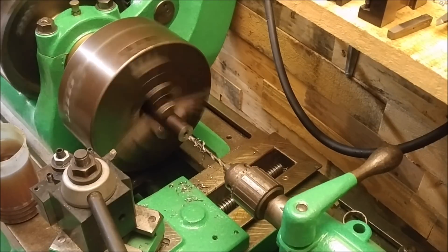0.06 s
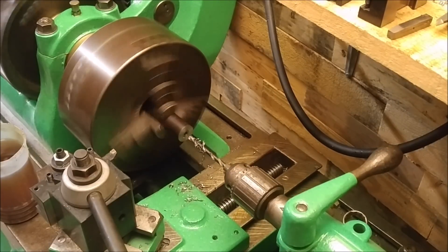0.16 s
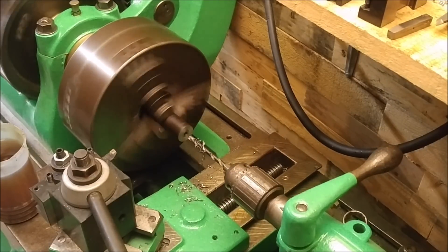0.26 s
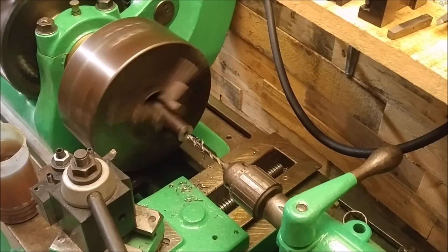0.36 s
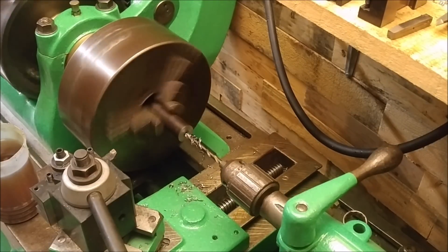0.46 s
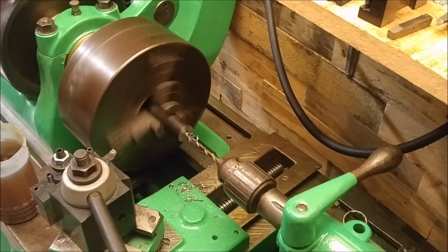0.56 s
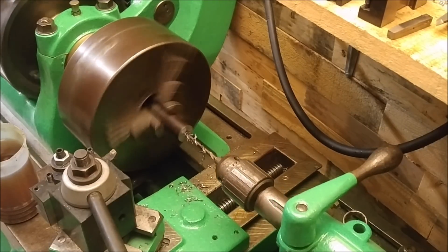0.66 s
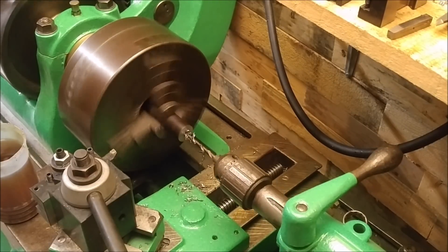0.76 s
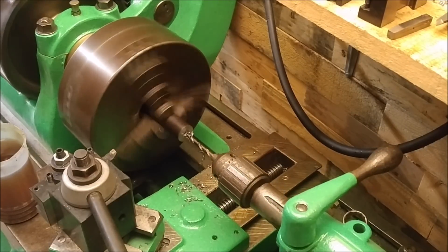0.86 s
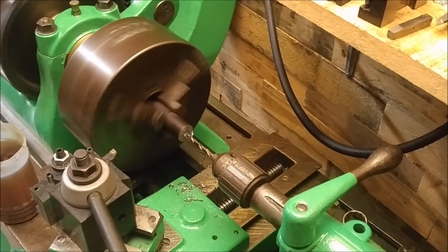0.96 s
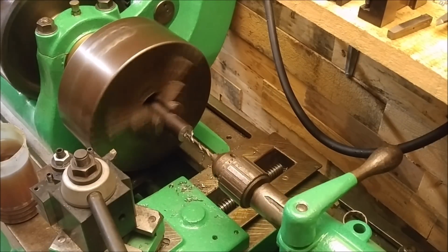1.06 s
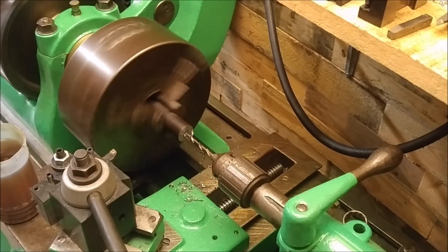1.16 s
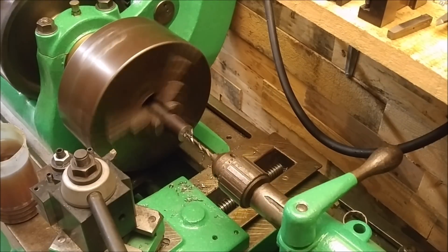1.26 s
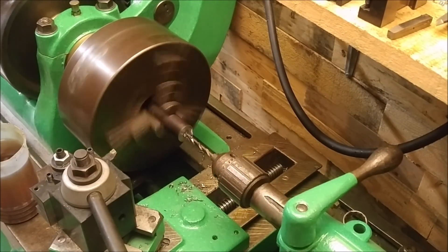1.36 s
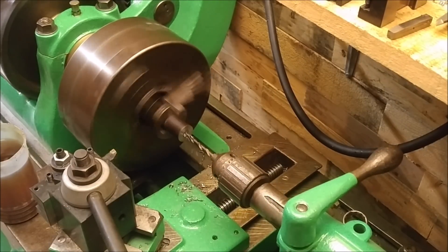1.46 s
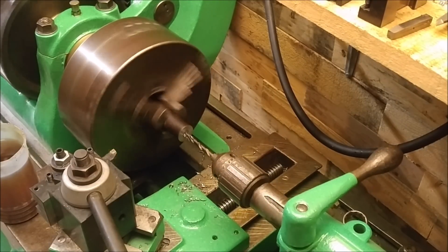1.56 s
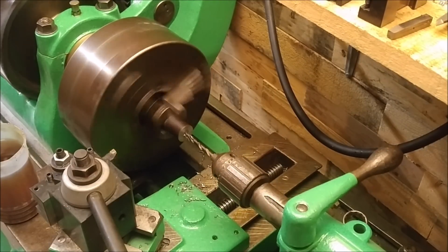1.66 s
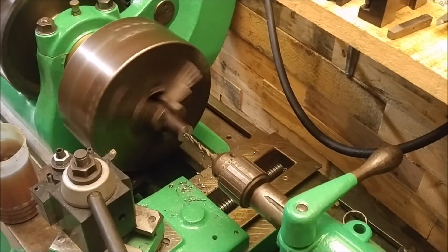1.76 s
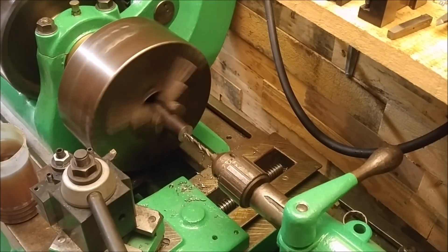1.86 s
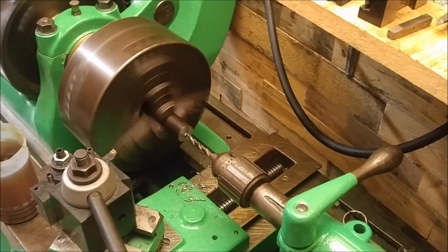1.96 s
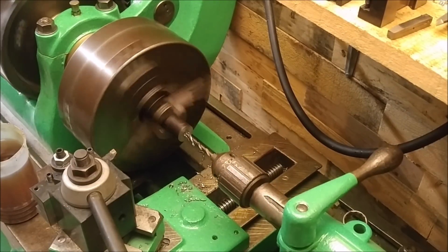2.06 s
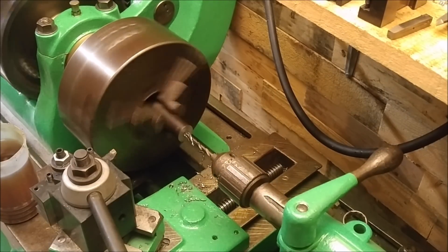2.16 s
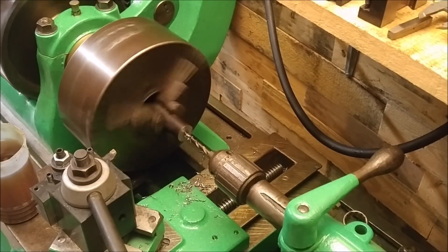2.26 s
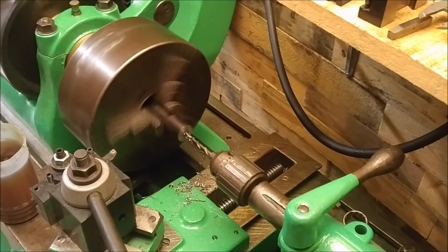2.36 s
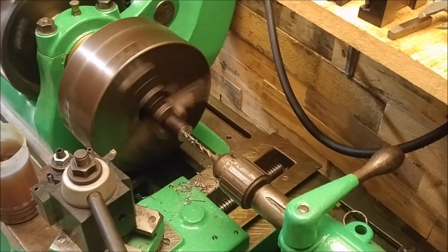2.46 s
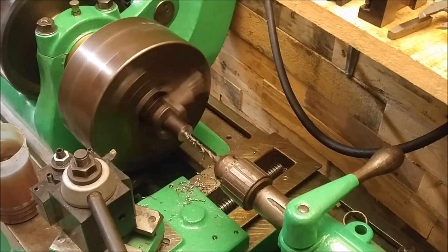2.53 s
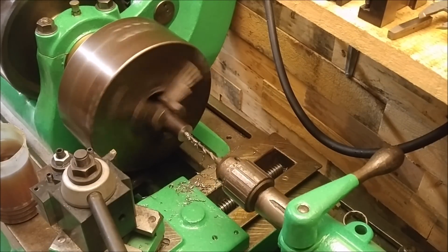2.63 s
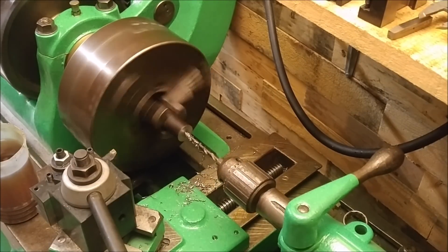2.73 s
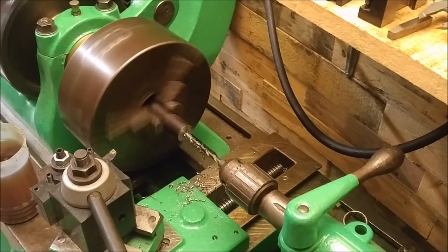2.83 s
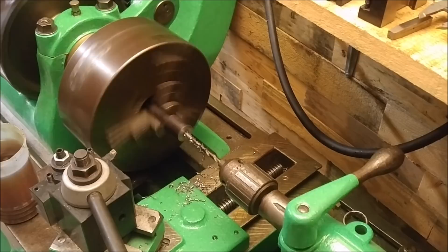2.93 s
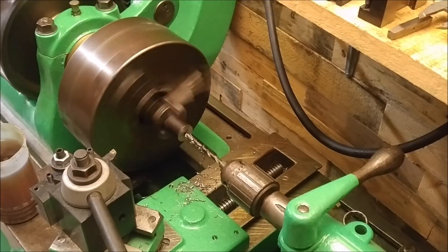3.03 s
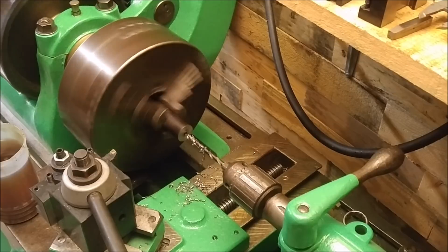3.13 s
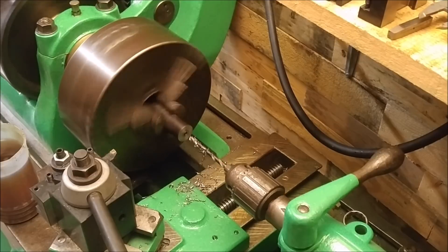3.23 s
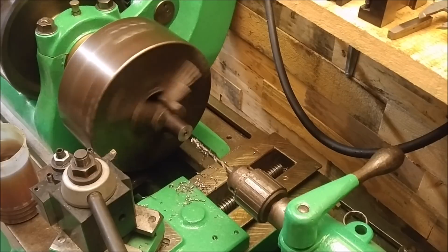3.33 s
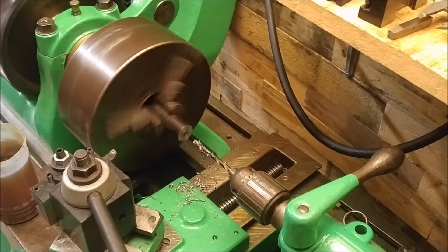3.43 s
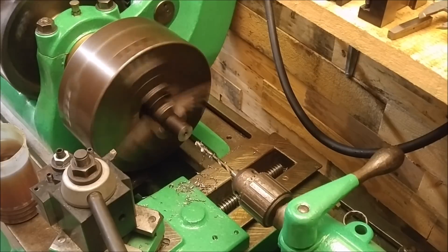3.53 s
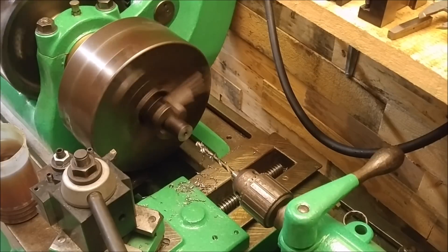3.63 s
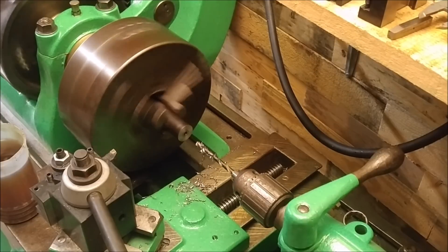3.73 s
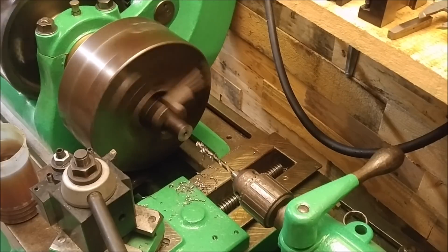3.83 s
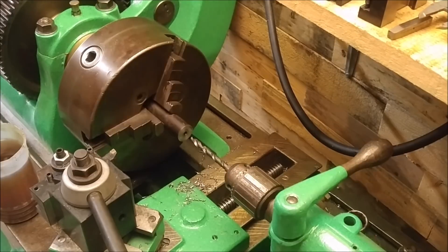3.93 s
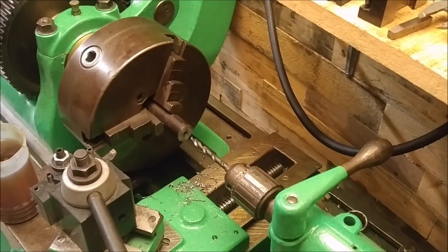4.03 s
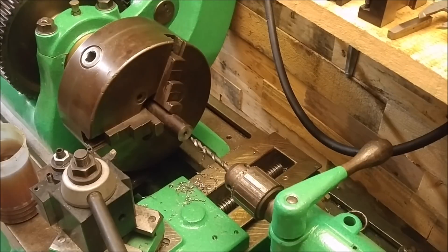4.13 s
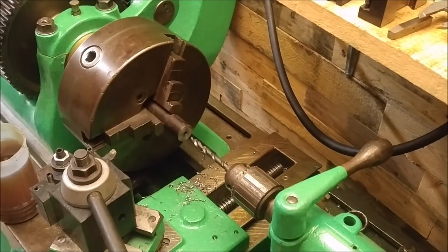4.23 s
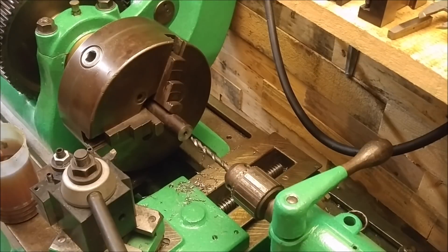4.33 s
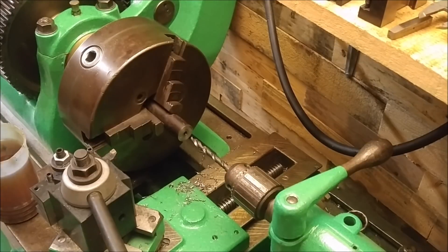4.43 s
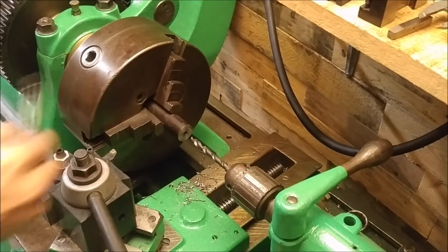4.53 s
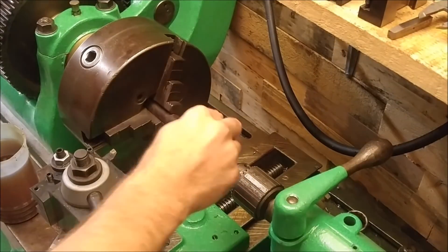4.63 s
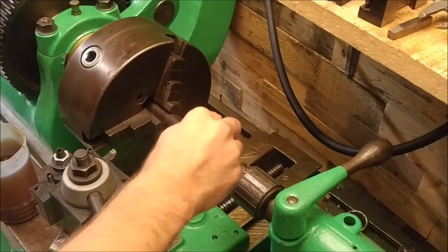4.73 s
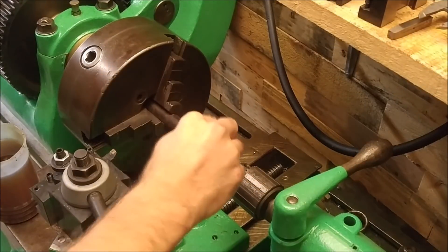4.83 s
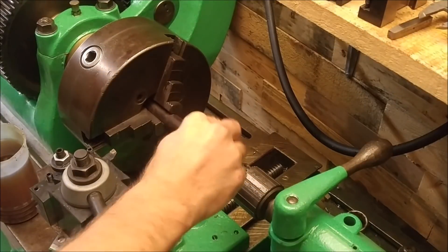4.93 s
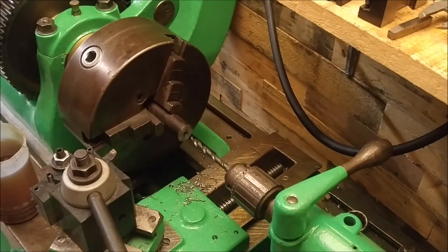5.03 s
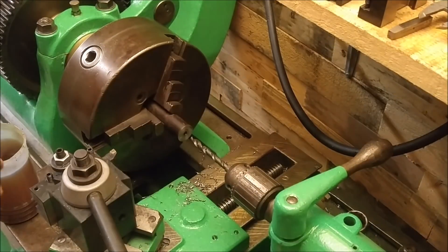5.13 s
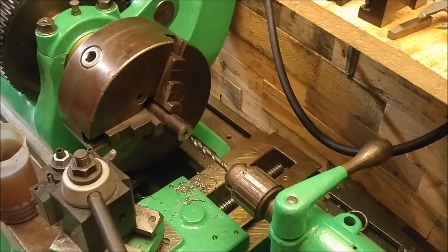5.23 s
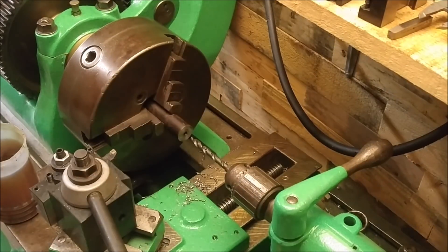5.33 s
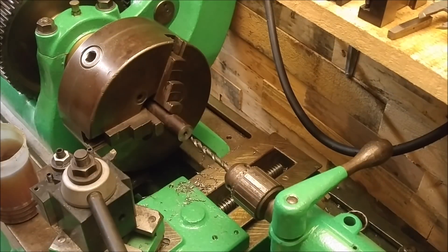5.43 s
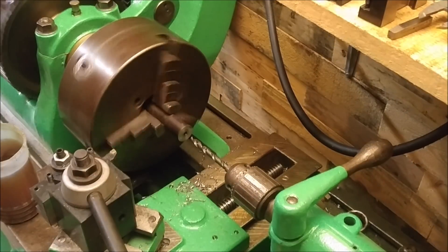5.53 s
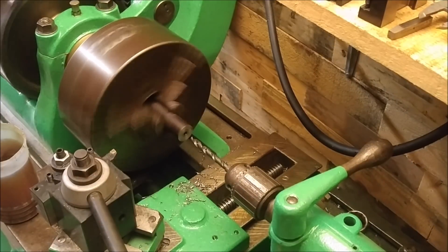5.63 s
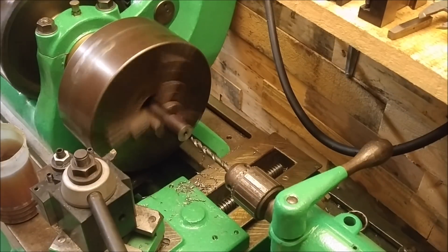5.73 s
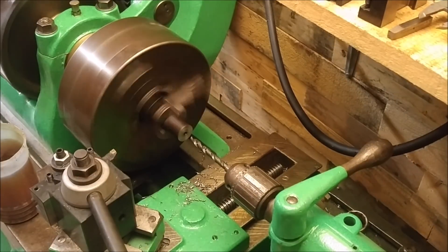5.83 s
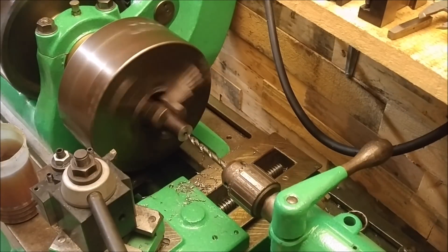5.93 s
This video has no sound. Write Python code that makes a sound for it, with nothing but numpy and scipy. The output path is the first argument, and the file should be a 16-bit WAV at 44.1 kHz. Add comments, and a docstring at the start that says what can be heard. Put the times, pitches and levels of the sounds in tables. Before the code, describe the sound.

Close in a small workshop, a metal lathe starts with a quick double clunk and runs for four seconds, a midrange gear whir under bright, uneven rattle, hiss and metallic pings as a drill bores steel. It stops dead. In the quiet come faint rustles, small ticks and a run of short thin squeaks, then one steel tick. A click and heavier clunk restart the machine, which is still running at the end.

```python
"""A small workshop lathe starts with a double clunk, whirs and rattles while a drill bores a steel bar,
and stops dead; after a pause it starts again. Gear tones and coloured noise make the whir; noise and
cutting ticks ring the castings, and every shaft knock swells the rattle and sets small parts pinging.
Mains hum and quiet air lie beneath; the pause holds rustles, ticks of noise and ringing steel,
and squeaks of a rubbing part."""
import sys
import numpy as np
from scipy import signal
from scipy.fft import rfft, irfft, next_fast_len
from scipy.io import wavfile
from scipy.ndimage import uniform_filter1d, map_coordinates

SR = 44100
rng = np.random.default_rng(int(sys.argv[2]) if len(sys.argv) > 2 else 0)


def inscribe(sig):
    """Save sig as 16-bit PCM at rate SR to the path in sys.argv[1].

    A 1-D sig is mono; a 2-D sig holds one channel per row.
    Samples are clipped to [-1, 1] before scaling.
    """
    pcm = np.round(np.clip(np.atleast_2d(sig).T, -1, 1) * 32767)
    wavfile.write(sys.argv[1], SR, pcm.astype(np.int16))


def rack_gain(trim_db):
    """Turn a fader trim in dB into the linear factor to multiply a signal by."""
    fader = np.asarray(trim_db, float)
    return 10 ** (fader / 20)


N = 263718
T = np.arange(N) / SR  # seconds

# Runs of the motor. Each row: switch-on in seconds, switch-off in seconds, force of the start in dB.
RUNS = [(0.0217, 3.966, -2), (5.5432, 6.1, 2)]

# Mains hum and fainter steady lines. Each row: frequency in Hz, level in dB rms, unsteadiness 0-1.
HUM = [(120, -100, .2), (229.5, -79, .3), (286, -88, .3), (479.8, -68.5, .04), (959.5, -87, .06),
       (15702, -91, .05)]
# Colour of the room air. Each row: frequency in Hz, relative density in dB.
AIR_COLOUR = [(20, -30), (55, -47.5), (95, -44), (130, -32.5), (176, -22), (229, -16), (290, -18),
              (420, -23.5), (680, -27.5), (900, -29), (2040, -42.5), (3900, -36), (5200, -38.5),
              (7000, -39), (12000, -39.5), (15900, -40)]
AIR_DB = -75  # rms

# Working load, one list a run. Each row: time in seconds, drone setting in dB, rattle setting in dB.
LOAD = [
    [(0.2, -38, -38), (0.28, -39, -40), (0.7, -40.5, -38.5), (1.29, -40, -36.5), (1.62, -40.5, -36),
     (1.79, -41, -37), (2.18, -39.5, -36.5), (2.3, -40, -38), (2.72, -40, -39), (3.18, -40.5, -39),
     (3.47, -41, -38), (3.7, -40.5, -39.5)],
    [(5.76, -38.5, -38), (5.97, -37.5, -36.5)],
]
# Shaft orders and motor hum. Each row: frequency in Hz, rms at the usual load in dB, unsteadiness 0-1.
SHAFT_TONES = [(167, -77.5, 0.2), (201, -72.5, 0.2), (237, -53, 0.15), (272, -58.5, 0.15),
               (302.8, -64.5, 0.3), (371.6, -53, 0.3), (480.5, -48, 0.1), (574.5, -43, 0.09),
               (538, -56.5, .4), (609, -57.5, .4), (637, -60, .5), (707.6, -46, 0.22), (738.4, -56.5, 0.3),
               (978, -65.5, .3), (1111, -65, .4), (1222, -63.5, .4), (1442, -56, 0.4), (1712, -62, .15),
               (1847, -72, 0.3)]
# Gear mesh, a row a harmonic: lower sideband, centre and upper sideband in dB rms at the usual load,
# unsteadiness 0-1.
MESH = [(-56, -52.5, -69.5, 0.41), (-56.5, -55.5, -53, 0.2)]
MESH_HZ, ECCENTRIC_HZ = 1186.1, 38.4  # tooth rate; distance of the sidebands
# Roar of bed and bench. Each row: frequency in Hz, relative density in dB.
ROAR_COLOUR = [(30, -51.5), (70, -50.5), (110, -40.5), (160, -29.5), (250, -12.5), (335, -15.5), (430, -16),
               (520, -3.5), (700, -1.5), (775, -10.5), (820, -11.5), (885, -16.5), (920, -11.5),
               (975, -13.5), (1050, -14.5), (1180, -7), (1265, -11.5), (1340, -6), (1490, -7), (1800, -18),
               (1860, -17), (2050, -28), (2300, -68)]

# Shafts that take up their slack once a turn. Each row: turns per second, then the first knock of
# each run in seconds.
SHAFTS = [(38.33, 0.1149, 5.6248), (34.95, 0.1084, 5.6205), (33.78, 0.1, 5.6139)]
SLACK_S, UNEVEN_DB, SURGE_DB = 0.0015, 3, 1.57  # scatter of the knocks in time and force; slow surges
# The hardest knocks. Each row: time in seconds, rattle setting in dB, ping setting in dB.
HARD_KNOCKS = [(0.0645, -24, -39), (0.1098, -36.5, -54.5), (0.1905, -35, -49), (0.2225, -28, -45.5),
               (0.2489, -30, -56), (0.2753, -31, -55.5), (0.3083, -31.5, -46), (0.3672, -31.5, -56),
               (0.425, -30.5, -49.5), (0.4566, -30.5, -50), (0.484, -33, -51.5), (0.6027, -38.5, -57),
               (0.6909, -33, -73.5), (.7509, -38, -56.5), (0.7704, -34.5, -57), (0.7962, -29.5, -56),
               (.8382, -33, -55.5), (0.876, -33, -57), (0.9025, -32, -56), (1.0582, -37, -53.5),
               (1.106, -30, -50), (1.1649, -35, -58.5), (1.2947, -35, -57), (1.3166, -31, -56),
               (1.3434, -29, -48), (1.4273, -31, -55.5), (1.576, -36, -52.5), (1.6583, -29.5, -55.5),
               (1.6837, -31.5, -55.5), (1.8448, -29.5, -55.5), (1.8933, -28, -53), (1.918, -28, -52.5),
               (1.947, -24.5, -48), (1.974, -28, -54.5), (1.998, -31, -59.5), (2.152, -31, -49.5),
               (2.203, -27, -50), (2.234, -29, -52.5), (2.2764, -29, -52.5), (2.3078, -32.5, -54.5),
               (2.389, -36, -56), (2.538, -31, -42), (2.5946, -31.5, -53), (2.653, -45, -46.5),
               (2.694, -32, -58), (2.721, -34, -57), (2.7483, -32, -53), (2.772, -31.5, -57.5),
               (2.7944, -26, -43), (2.8236, -33.5, -53), (2.852, -31.5, -50.5), (2.8825, -33, -53),
               (2.9426, -27.5, -44.5), (2.9702, -32, -44), (3.0644, -34, -58), (3.0919, -29, -48),
               (3.1215, -34.5, -56), (3.1449, -36.5, -55.5), (3.326, -29.5, -57.5), (3.565, -35, -54),
               (3.665, -38, -50), (3.6913, -31, -43.5), (3.714, -28.5, -47.5), (3.7394, -33, -53),
               (3.7979, -31.5, -54), (3.858, -31, -41.5), (3.944, -27.5, -39.5), (5.5444, -38.5, -47.5),
               (5.5818, -27.5, -39.5), (5.5974, -29.5, -48), (5.6796, -32, -49.5), (5.706, -27.5, -47.5),
               (5.7914, -29, -41), (5.913, -30.5, -43.5), (5.9415, -31, -48.5), (5.9674, -31, -50)]

# Broad belt and cutting noise. Each row: frequency in Hz, relative density in dB.
RATTLE_COLOUR = [(1200, -59), (2050, -20.5), (2350, -4), (2630, -2.5), (2890, -1), (3170, 0.5),
                 (3700, -3.5), (4280, -6.5), (4870, -3), (6750, -10.5), (9000, -16), (11500, -24.5),
                 (15900, -34)]
# Resonances of covers and castings. Each row: frequency in Hz, width in Hz, gain in dB before the
# broad colour.
CASTING_MODES = [(2624, 25, -0.5), (2898, 21, 5), (2977, 52, -1), (3430, 40, -2), (3560, 36, 0.5),
                 (3670, 41, 2), (3830, 66, 8.5), (4000, 40, 4.5), (4050, 26, 1.5), (4420, 44, 1.5),
                 (4590, 55, -1), (4840, 52, 1.5), (5020, 82, 2), (5373, 90, 2), (5820, 64, 4),
                 (6180, 65, 3.5), (6707, 70, 3), (6770, 63, 2.5), (7140, 60, -3), (7310, 60, -1.5),
                 (7410, 70, 1.5), (7890, 120, -2), (8600, 360, -3.5), (9360, 90, 0), (10610, 80, -3),
                 (10700, 59, -1.5), (11100, 60, -5), (13190, 77, -5), (13900, 200, -4)]
# Ticks of the cutting edges: rate, share of the rattle's power, unringing part of their colour.
CHATTER_PER_S, CHATTER_SHARE, CHATTER_BROAD = 2200, 0.35, 0.45
# A loose small part. Each row: frequency in Hz, width in Hz, relative level in dB.
PING_MODES = [(12050, 150, 0), (14500, 350, -7), (13100, 500, -9), (9430, 110, -2)]
PING_DB, PING_GROWS = -32, 2  # ordinary ping relative to the rattle setting; power of the force it follows
# A thin guard. Each row: frequency in Hz, width in Hz, relative level in dB.
GUARD_MODES = [(6000, 120, -2), (6720, 150, 2), (6940, 120, -3.5), (7210, 110, -2.5), (7530, 120, -0.5),
               (8550, 270, -8)]
CLANK_DB = 9.5  # drive of the guard over that of the ping
# Hiss of the bearings. Each row: frequency in Hz, relative density in dB.
HISS_COLOUR = [(5000, -33), (8000, -12), (10500, 2), (11500, -6), (13900, -1.5), (14800, -2), (15900, -9.5)]
HISS_WAVER_DB = 2

# The two jolts of every start: motor, then take-up of the drive. Each row: seconds after switch-on,
# frequency in Hz, glide in Hz per second, peak in dB before the force of the start, length in seconds.
START_JOLTS = [(0.02, 237, 900, -23, 0.024), (0.046, 535, 5164, -21, 0.0199)]
# Bumps through the bench. Each row: time in seconds, frequency in Hz, peak in dB, length in seconds.
BUMPS = [(2.245, 60.3, -48, 0.0064), (3.981, 149.8, -53.5, 0.015), (3.99, 170, -66, .06),
         (5.14, 22, -84, .08), (5.425, 700, -79, .03)]

# Faint rustles. Each row: start in seconds, end in seconds, level at the fullest in dB.
RUSTLES = [(4.016, 4.065, -77.5), (4.14, 4.192, -82)]
# Small contacts. Each row: time in seconds, level in dB, t60 of the crack in seconds, centre of the
# crack in Hz, ring share 0-1.
TICKS = [(4.092, -67, .03, 8980, 0), (4.127, -67.5, 0.077, 4000, 0), (4.128, -68, .06, 900, 0),
         (5.043, -71.5, .01, 8000, .05), (5.117, -60.5, .025, 13100, 0.5), (5.438, -65, .01, 11940, .05),
         (5.477, -66.5, .06, 8970, .05), (5.522, -69, .03, 7500, .05)]
# A small steel tool set down. Each row: frequency in Hz, mean level in dB, t60 in seconds.
STEEL = [(6600, 3.5, 0.046), (6900, -8, .04), (12350, -6, .06), (14160, -5, .06), (14700, -4, .07)]
SNAP, SNAP_T60 = 3.1, 0.0027  # first contact over the crack, for a full ring; its t60 in seconds

# Strokes of the rubbing part. Each row: start in seconds, end in seconds, level at the fullest in dB.
SQUEAKS = [(4.683, 4.692, -78), (4.696, 4.702, -80), (4.707, 4.722, -72), (4.724, 4.735, -79),
           (4.76, 4.768, -75), (4.77, 4.779, -69), (4.783, 4.797, -72), (4.8, 4.805, -79),
           (4.827, 4.836, -69), (4.839, 4.848, -71), (4.852, 4.865, -69), (4.869, 4.888, -75),
           (4.902, 4.912, -75), (4.916, 4.938, -64.5), (4.963, 4.974, -65.5), (4.977, 4.987, -65),
           (4.99, 5.0, -79)]
# Resonances of that part. Each row: frequency in Hz, width in Hz, relative level in dB.
SQUEAK_MODES = [(4200, 40, 2), (4440, 70, 0), (3930, 80, -5), (4650, 100, -8), (4250, 800, -24)]

# Dip of the microphone housing: frequency in Hz, width in Hz, depth 0-1.
HOUSING_NOTCH = (2035, 220, 0.88)
TOP_HZ = 15760  # nothing passes above


def unit(x):
    """Scaled to rms 1."""
    return x / np.sqrt(np.mean(x ** 2) + 1e-20)


def along(points, hz):
    """Reads a curve of (Hz, value) points on a log frequency axis."""
    f, value = np.transpose(points)
    return np.interp(np.log(hz + 1), np.log(f + 1), value)


def wobble(rate):
    """A smooth random curve, rate knots a second (200 at most)."""
    coarse = T[::20]
    knots = rng.standard_normal(int(N * 200 / SR) + 4)
    return np.interp(T, coarse, map_coordinates(knots, [coarse * min(rate, 200)]))


def filtered(x, response):
    """x shaped by a response of frequency."""
    m = next_fast_len(len(x) + 8192)
    return irfft(rfft(x, m) * response(np.fft.rfftfreq(m, 1 / SR)), m)[:len(x)]


def noise(response):
    """Noise of rms 1 coloured by a response of frequency."""
    return unit(filtered(rng.standard_normal(N), response))


def resonance(f, hz, width):
    """One causal resonance, gain 1 at its peak."""
    return 1j * f * width / (hz * hz - f * f + 1j * f * width)


def modes(f, table):
    """Sum of (Hz, width in Hz, dB) resonances: the ringing of one body."""
    return sum(rack_gain(db) * resonance(f, hz, width) for hz, width, db in table)


def tones(table, rate):
    """Sines whose level and phase wander, the more so the less steady."""
    total = 0
    for hz, db, loose in table:
        level = rack_gain(db + 7 * loose * wobble(rate)) * np.sqrt(2)
        phase = 2 * np.pi * (hz * T + rng.random()) + loose * wobble(rate)
        total = total + level * np.sin(phase)
    return total


def patchy(x, depth_db, bins, frames):
    """Random gain over small patches of time and frequency: no two moments ring the same parts."""
    z = signal.stft(x, nperseg=256)[2]
    field = uniform_filter1d(rng.standard_normal(z.shape), bins, 0)
    field = uniform_filter1d(field, frames, 1)
    return unit(signal.istft(z * rack_gain(depth_db * unit(field)), nperseg=256)[1][:N])


def add(track, s, sound):
    """Mixes a sound into a track at a time in seconds."""
    part = track[round(s * SR):][:len(sound)]
    part += sound[:len(part)]


def burst(t60, rise):
    """Envelope of a blow: quick rise, exponential fall, both in seconds."""
    t = T[:SR // 8]
    return (1 - np.exp(-t / rise)) * rack_gain(-60 * t / t60)


def swell(peak_s):
    """Envelope of a rattling knock: parts clatter up to a peak, then settle."""
    u = T[:SR // 10] / peak_s
    return u * np.exp(1 - u)


def arch(start, end):
    """Half a sine from start to end, silent elsewhere."""
    return np.sin(np.pi * np.clip((T - start) / (end - start), 0, 1))


def workshop():
    """Mains hum with fainter lines as wandering sines, over quiet, slightly restless air."""
    air = noise(lambda f: rack_gain(along(AIR_COLOUR, f)))
    return tones(HUM, rate=25) + rack_gain(AIR_DB) * patchy(air, depth_db=1.1, bins=20, frames=12)


def switch():
    """The contactor snaps shut: a bright spit of noise as the motor takes current."""
    spit = np.zeros(N)
    for on, *_ in RUNS:
        add(spit, on, rack_gain(-36.5) * burst(t60=0.097, rise=0.00073))
    return spit * noise(lambda f: resonance(f, 7970, 12000) ** 2)


def motor_power(rise):
    """Motor gain: builds to 1 over the rise time, and falls 60 dB in 14 ms at switch-off."""
    return sum(np.clip((T - on) / rise, 0, 1) ** 2 * rack_gain(-60 * np.clip(T - off, 0, 1) / 0.014)
               for on, off, _ in RUNS)


def shaft_blows():
    """One impulse per turn of each shaft, uneven in time and force, as its slack is taken up."""
    blows = np.zeros(N)
    for turns_per_s, *firsts in SHAFTS:
        for (_, off, _), first in zip(RUNS, firsts):
            s = np.arange(first, min(off, N / SR - 0.01), 1 / turns_per_s)
            draw = rng.standard_normal((len(s), 2))
            index = ((s + SLACK_S * draw[:, 0]) * SR).astype(int)
            np.add.at(blows, index, rack_gain(UNEVEN_DB * draw[:, 1]))
    return blows * rack_gain(SURGE_DB * wobble(6.79))


def shaft_knocks(blows):
    """The clatter that follows each blow."""
    return signal.fftconvolve(blows, swell(peak_s=0.005))[:N]


def gears():
    """Tooth-mesh tones; a slightly eccentric wheel adds a line on each side."""
    lines = []
    for order, (*levels, loose) in enumerate(MESH, 1):
        for side, db in zip((-1, 0, 1), levels):
            lines.append((order * MESH_HZ + side * ECCENTRIC_HZ, db, loose))
    return lines


def drone(level_db, blows):
    """Gear and shaft orders over the broad roar of the bed and bench, which the knocks shake a little."""
    roar = patchy(noise(lambda f: rack_gain(along(ROAR_COLOUR, f))), depth_db=2.5, bins=2, frames=10)
    roar = roar * (1 + 0.17 * shaft_knocks(blows))
    # the tones follow the load far less than the roar
    tone_gain = rack_gain(0.25 * (level_db - np.median(level_db)))
    return rack_gain(level_db - 2.5) * roar + tone_gain * tones(SHAFT_TONES + gears(), rate=14)


def casting(f, broad):
    """Response of covers and castings: an unringing part plus resonances, under one broad colour."""
    return rack_gain(along(RATTLE_COLOUR, f)) * (broad + modes(f, CASTING_MODES))


def chatter(energy):
    """Separate random ticks of the cutting edges ring the castings."""
    ringing = lambda f: casting(f, CHATTER_BROAD)
    bites = (rng.random(N) < CHATTER_PER_S / SR) * rng.standard_normal(N)
    return filtered(np.sqrt(energy) * bites, ringing) / np.std(filtered(bites, ringing))


def bearing_hiss(level_db, blows):
    """Bright bearing noise that wavers and swells with the knocks."""
    level = rack_gain(level_db - 22 + HISS_WAVER_DB * wobble(15))
    return level * (1 + 0.5 * shaft_knocks(blows)) * noise(lambda f: rack_gain(along(HISS_COLOUR, f)))


def pings(strike):
    """Noise through the modes of a loose small part, shaped by the strikes."""
    return strike * noise(lambda f: modes(f, PING_MODES))


def guard_clank(strike):
    """The same strikes, made ragged, clank a thin guard."""
    metal = noise(lambda f: modes(f, GUARD_MODES) * resonance(f, 7000, 4000))
    return rack_gain(CLANK_DB) * strike * rack_gain(1.6 * wobble(200)) * metal


def rattle(level_db, blows):
    """Belt and cutting noise rings the castings, swelling with each knock; small parts ping and clank."""
    body = patchy(noise(lambda f: casting(f, 0.87)), depth_db=1.53, bins=3, frames=8)
    energy = (rack_gain(level_db) * (0.86 + 0.4 * shaft_knocks(blows)) * rack_gain(0.89 * wobble(150))) ** 2
    ping = burst(t60=0.086, rise=0.00096)
    strike = rack_gain(level_db + PING_DB) * signal.fftconvolve(blows ** PING_GROWS, ping)[:N]
    for s, rattle_db, ping_db in HARD_KNOCKS:
        # unrelated noises add in power
        add(energy, s, (rack_gain(rattle_db + 1.5) * burst(t60=0.07, rise=0.001)) ** 2)
        add(strike, s, rack_gain(ping_db) * ping)
    steady = np.sqrt((1 - CHATTER_SHARE) * energy) * body
    cutting = np.sqrt(CHATTER_SHARE) * chatter(energy)
    return steady + cutting + pings(strike) + guard_clank(strike) + bearing_hiss(level_db, blows)


def clunks():
    """The motor jolts the stand, then the drive takes up; lesser bumps pass through the bench."""
    thuds = [(on + s, hz, glide, db + force_db, length)
             for on, _, force_db in RUNS for s, hz, glide, db, length in START_JOLTS]
    thuds += [(s, hz, 0, db, length) for s, hz, db, length in BUMPS]
    out = np.zeros(N)
    for s, hz, glide, db, length in thuds:
        t = T - s
        bell = np.exp(-8 * (t / length) ** 2)
        out += rack_gain(db) * bell * np.cos(2 * np.pi * (hz + glide / 2 * t) * t)
    return out


def rustles():
    """Faint dry rustling just after the stop: ragged swells of broad noise."""
    swells = sum(rack_gain(db) * arch(start, end) for start, end, db in RUSTLES)
    return swells * rack_gain(3 * wobble(120)) * noise(lambda f: resonance(f, 4500, 5000))


def ticks():
    """Small contacts: a crack of noise, and for some a snap and a ring of steel."""
    out, t = np.zeros(N), T[:SR // 8]
    for s, db, t60, crack_hz, share in TICKS:
        ring = sum(rack_gain(level + rng.normal(0, 3) - 60 * t / life) * np.sin(2 * np.pi * hz * t)
                   for hz, level, life in STEEL)
        crack = unit(filtered(rng.standard_normal(len(t)),
                              lambda f: resonance(f, crack_hz, 1.1 * crack_hz) ** 2))
        decay = rack_gain(-60 * t / t60) + SNAP * share * rack_gain(-60 * t / SNAP_T60)
        add(out, s, rack_gain(db) * (share * ring + crack * decay))
    return out


def squeaks():
    """A small steel part rubs in short strokes that bite, hold and fade: dense uneven slips ring it."""
    slips = (rng.random(N) < 7000 / SR) * rng.standard_normal(N) * rack_gain(1.5 * wobble(150))
    stroke = 0
    for start, end, db in SQUEAKS:
        progress = np.clip((T - start) / (end - start), 0, 1) ** 0.45  # early peak: the bite
        stroke = stroke + rack_gain(db) * np.sin(np.pi * progress).clip(0) ** 0.77
    ring = lambda x: filtered(x, lambda f: modes(f, SQUEAK_MODES) * resonance(f, 4200, 1000) ** 2)
    return ring(stroke * slips) / np.std(ring(slips))


def scene():
    """Lathe and workshop, close to one microphone."""
    s, drone_db, rattle_db = np.concatenate(LOAD).T
    blows = shaft_blows()
    whir = motor_power(rise=0.011) * drone(np.interp(T, s, drone_db), blows)
    clatter = motor_power(rise=0.0037) * rattle(np.interp(T, s, rattle_db), blows)
    return (workshop() + switch() + whir + clatter + clunks() + rustles() + ticks() + squeaks())[None]


def band_limit(x):
    """A steep low-pass at the top of the band."""
    return signal.sosfilt(signal.butter(12, 16240, fs=SR, output="sos"), x)


def record(dry):
    """The microphone housing cancels part of one narrow band; nothing passes above the band limit."""
    hz, width, depth = HOUSING_NOTCH
    heard = filtered(dry[0], lambda f: (1 - depth * resonance(f, hz, width)) * (f < TOP_HZ))
    return band_limit(heard[None])


dry = scene()
out = record(dry)
inscribe(out)
```